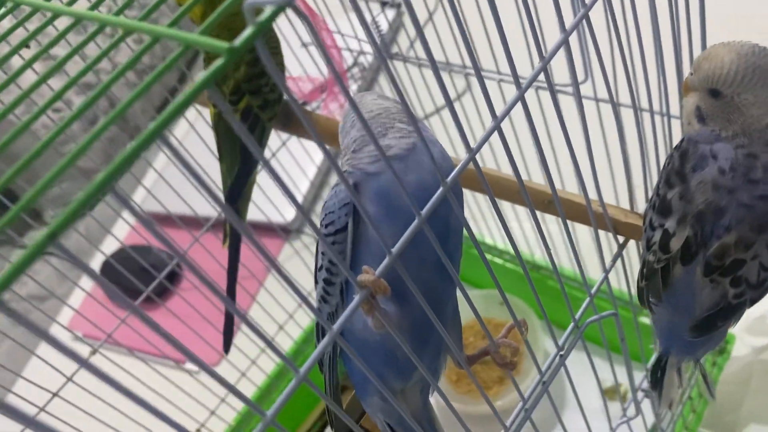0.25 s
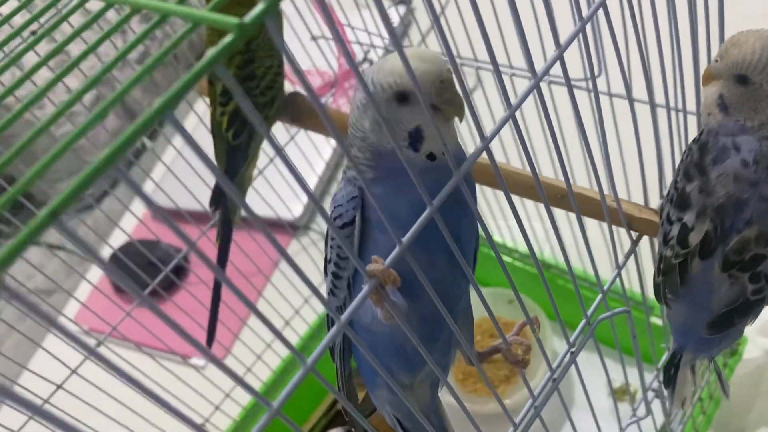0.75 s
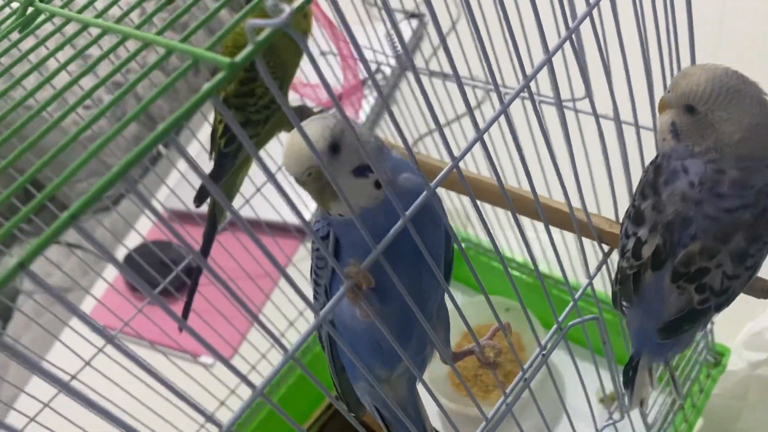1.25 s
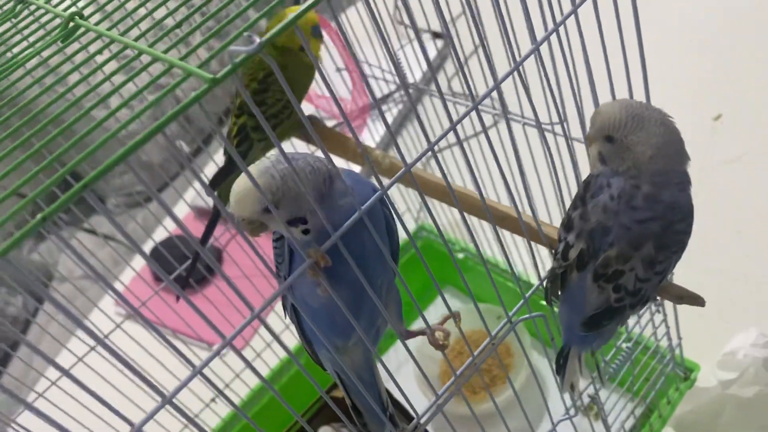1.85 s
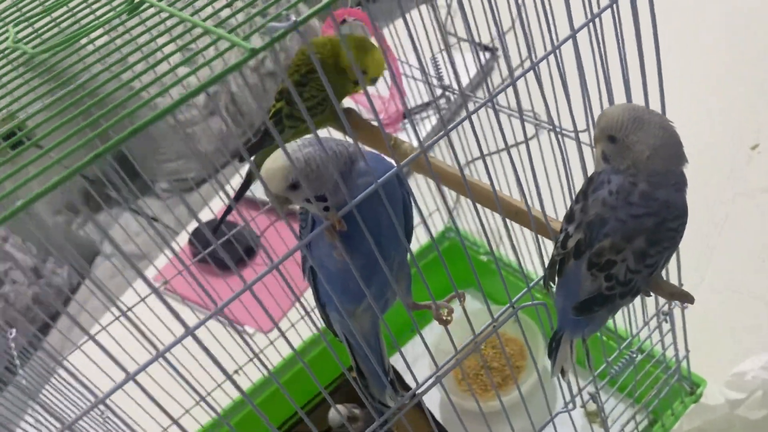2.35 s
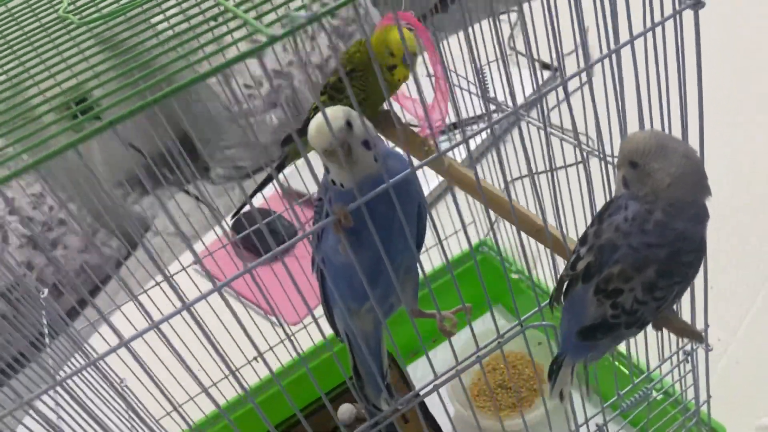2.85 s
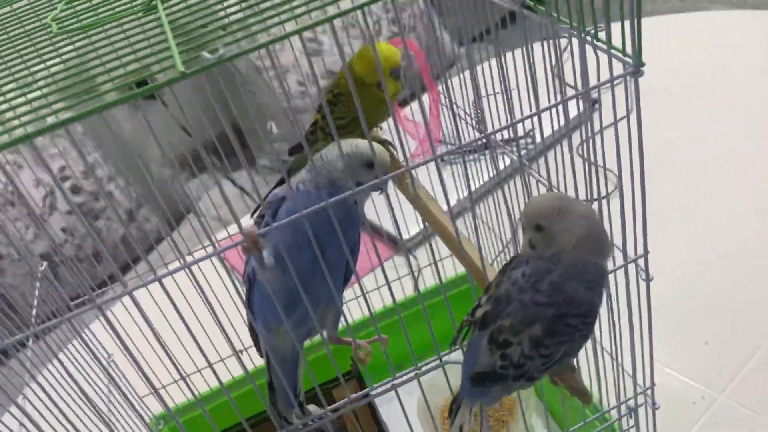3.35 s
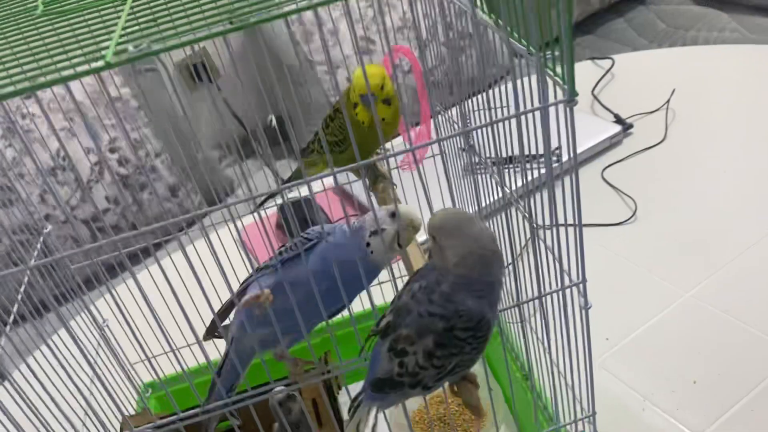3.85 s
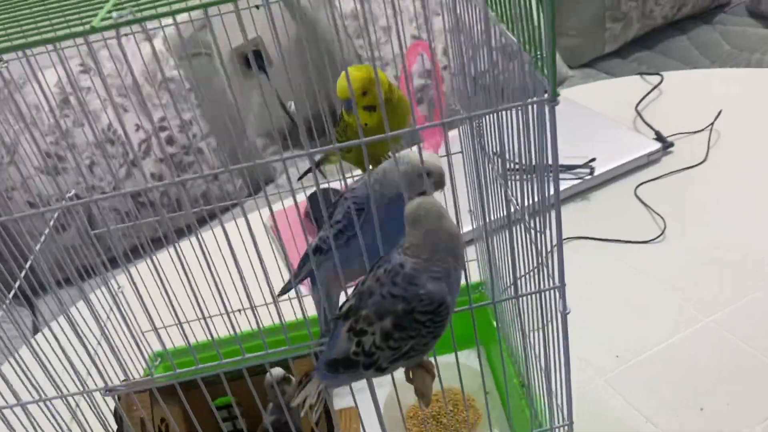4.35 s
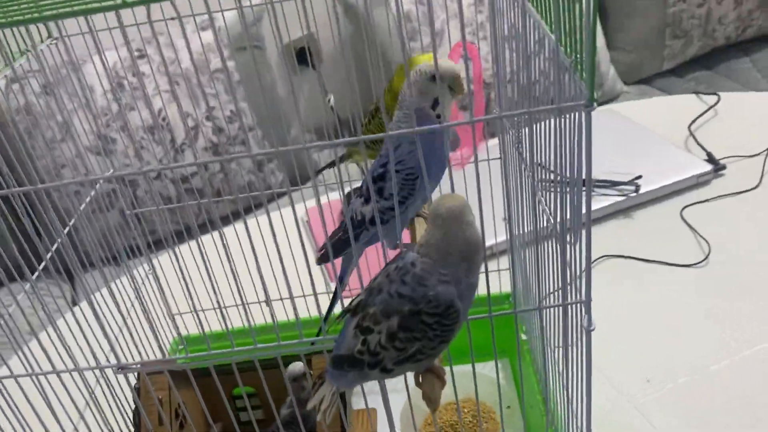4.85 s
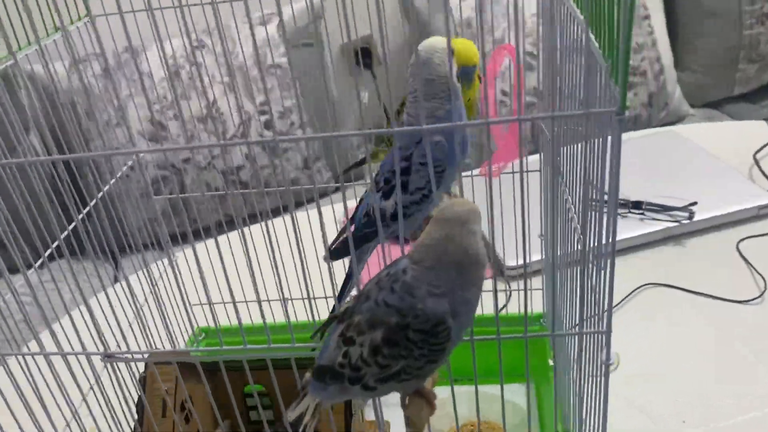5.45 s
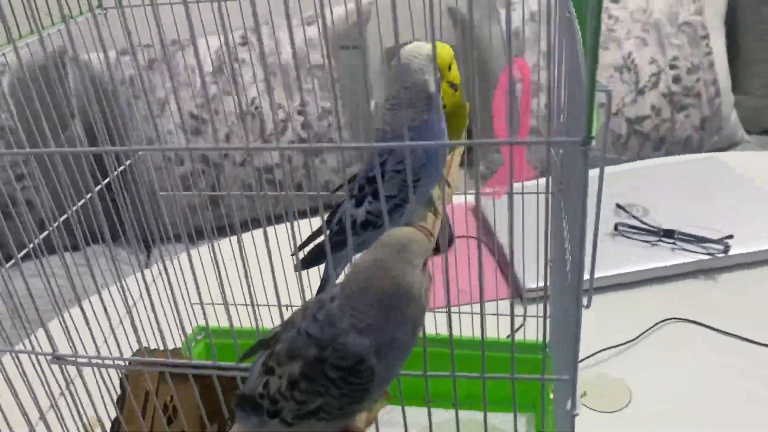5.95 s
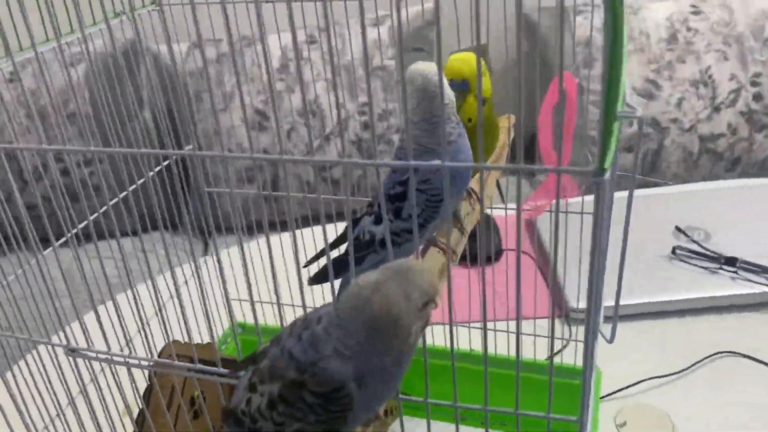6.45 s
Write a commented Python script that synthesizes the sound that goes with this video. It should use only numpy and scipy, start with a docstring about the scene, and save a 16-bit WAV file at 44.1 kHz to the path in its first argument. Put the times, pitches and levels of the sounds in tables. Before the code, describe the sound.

Small caged parrots chatter in short, high calls with brief lulls, adding soft clucking, thin warbles and a few buzzes.

```python
"""Three budgerigars chirp, cheep, squeal and warble in a wire cage in a living room, close to a phone. Each
bird's voice box (the syrinx) whistles, and rasps when a second, slower vibration shakes it. Between the calls
come rising clucks, a few buzzes, light taps of beak and claws, a low thump of wing or body, and one soft plop.
The hand holding the phone makes a low rustle, and the room rings briefly after the birds' sounds."""
import sys
import numpy as np
from scipy import signal
from scipy.fft import rfft, irfft
from scipy.io import wavfile
from scipy.ndimage import map_coordinates

SR = 44100
rng = np.random.default_rng(int(sys.argv[2]) if len(sys.argv) > 2 else 0)


def digitize_waveform(pressure):
    """Quantize a signal to 16-bit integers and store it at the path in sys.argv[1].

    Rows of a 2-D input are taken as channels; values are limited to [-1, 1].
    """
    field = np.atleast_2d(pressure).T
    bounded = np.clip(field, -1, 1)
    quanta = np.round(bounded * 32767).astype(np.int16)
    wavfile.write(sys.argv[1], SR, quanta)


N = 295470

# How well throat and beak let overtones and breath out. Each row: frequency in Hz, gain in dB.
BEAK_COLOUR = [(2500, -0.5), (4700, 10), (6000, -5), (7100, -4.5), (8400, -5.5), (9800, -19.5)]


def undb(db):
    """Turn decibels into a factor to multiply by."""
    return 10 ** (np.asarray(db) / 20)


def unit(x):
    """Scale a sound to an average strength (rms) of 1."""
    return x / np.sqrt(np.mean(x ** 2) + 1e-20)


def along(points, hz):
    """Read between (Hz, value) points, giving every octave equal space."""
    f, value = np.transpose(points)
    return np.interp(np.log(np.maximum(hz, 1)), np.log(f), value)


def shaped(x, colour):
    """Filter a sound by (Hz, dB) points and scale it to strength 1."""
    gain = undb(along(colour, np.fft.rfftfreq(len(x), 1 / SR)))
    return unit(irfft(rfft(x) * gain, len(x)))


def noise(colour):
    """Noise with the given mix of lows and highs."""
    return shaped(rng.standard_normal(N), colour)


def highpass(x, hz, order):
    """Cut the lows."""
    return signal.sosfilt(signal.butter(order, hz, "high", fs=SR, output="sos"), x)


def flutter(t, hz):
    """A smooth wobble through hz random values a second."""
    steps = rng.standard_normal(1024)
    return map_coordinates(steps, [t * hz], order=3, mode="wrap")


def gate(t, length, edge):
    """Fade in and out, taking edge seconds each way."""
    return np.sin(np.pi / 2 * np.clip(np.minimum(t, length - t) / edge, 0, 1)) ** 2


def ring(hz, width):
    """The fading tone of a resonance struck once; a wider one fades sooner."""
    t = np.arange(1024) / SR
    return 2 * np.pi * width / SR * np.exp(-np.pi * width * t) * np.sin(2 * np.pi * hz * t)


def add(out, start, sound, pan_db=0):
    """Place a sound in the stereo track; pan_db is left minus right."""
    i = int(start * SR)
    part = sound[max(-i, 0):max(N - i, 0)]
    i = max(i, 0)
    out[:, i:i + len(part)] += undb(np.array([[pan_db], [-pan_db]]) / 2) * part


def air_and_rustle(air_db=-74, rustle_db=-59.5, start_s=3.85, hold_s=0.28, rise_db_per_s=31,
                   fall_db_per_s=20.5, width=0.36):
    """Still room air, and the hand on the phone: a low rustle that swells, holds and dies away."""
    # The tone of each noise. Each row: frequency in Hz, relative level in dB.
    air_colour = [(25, -7), (75, 3.5), (500, -9), (3000, -21.5), (10500, -35.5)]
    rustle_colour = [(25, -16.5), (70, 2), (150, -6.5), (250, -10), (520, -9.5), (610, -3.5), (720, -12.5),
                     (10000, -48)]
    t = np.arange(N) / SR
    since = t - start_s
    fade_db = rise_db_per_s * np.maximum(-since, 0) + fall_db_per_s * np.maximum(since - hold_s, 0)
    uneven_db = rustle_db - fade_db + 3 * flutter(t, 30)
    out = 0
    for colour, db in ((air_colour, air_db), (rustle_colour, uneven_db)):
        out = out + undb(db) * (noise(colour) + width * np.array([[1], [-1]]) * noise(colour))
    return out


def cage_taps(decay_s=0.0024, trim_db=-1.5):
    """Beak and claws make dry little knocks on bars and perch; the low first one is a thump of wing or body."""
    # Each row: start in seconds, level in dB before the trim, centre frequency in Hz.
    knocks = [(0.526, -59, 280), (0.89, -67, 600), (2.423, -58, 3110), (3.447, -59, 1870),
              (6.572, -54, 1114)]
    out = np.zeros((2, N))
    t = np.arange(512) / SR
    for start, db, hz in knocks:
        contact = rng.standard_normal(len(t)) * np.exp(-t / decay_s)
        knock = np.convolve(contact, ring(hz, width=hz))[:len(t)]
        add(out, start, undb(db + trim_db) * unit(knock))
    return out


def plop(fall=0.065):
    """A soft hollow plop near the phone: a few cycles of a low falling tone."""
    # Each row: start in seconds, length in seconds, pitch in Hz, level in dB.
    plops = [(2.233, 0.011, 546, -40)]
    out = np.zeros((2, N))
    for start, length, hz, db in plops:
        progress = np.linspace(0, 1, int(length * SR))
        phase = 2 * np.pi * np.cumsum(hz * (1 + fall * (.5 - progress))) / SR
        swell = np.sin(np.pi * np.sqrt(progress)) ** 2
        add(out, start, undb(db) * unit(np.sin(phase) * swell))
    return out


def buzzes(jitter=.14, scatter_db=3, hiss=0.083, edge_s=0.0095):
    """Slow, uneven slaps of the voice box make the throat ring, with a little breath between them."""
    # Each row: start and length in seconds, slaps a second, level in dB, treble tilt in dB.
    bursts = [(5.555, 0.038, 332.5, -39.5, -2.5), (5.586, 0.036, 257.4, -48.5, -10.5),
              (5.626, 0.043, 226.2, -45, -5), (5.669, 0.026, 136.4, -52, -7),
              (5.687, 0.093, 135.7, -63, -30.5), (5.874, 0.041, 93.5, -62, -17),
              (5.91, 0.044, 133.8, -54.5, -15), (6.076, 0.095, 415.6, -64, -13),
              (6.363, 0.022, 791, -31, 2)]
    # The throat's resonances. Each row: frequency in Hz, width in Hz, gain in dB before the tilt.
    resonances = [(1120, 790, 2.5), (2000, 1360, 4.5), (3790, 1130, 4.5), (6400, 1800, -8),
                  (9020, 1320, -19.5)]
    out = np.zeros((2, N))
    for start, length, rate_hz, db, treble_db in bursts:
        t = np.arange(int(length * SR)) / SR
        chance = rng.standard_normal((128, 2))
        gaps = np.exp(jitter * chance[:, 0])
        slap_samples = ((np.cumsum(gaps) - .8) / rate_hz * SR).astype(int).clip(0)
        slaps = np.bincount(slap_samples, undb(scatter_db * chance[:, 1]), len(t))[:len(t)]
        breath = hiss * np.sqrt(rate_hz / 300) * rng.standard_normal(N)[:len(t)]
        drive = (slaps + breath) * (0.15 + gate(t, length, edge_s))
        throat = sum((-1) ** k * undb(gain_db + treble_db * np.log(hz / 1000)) * ring(hz, width)
                     for k, (hz, width, gain_db) in enumerate(resonances))
        sound = highpass(signal.fftconvolve(drive, throat), 280, order=1)
        add(out, start, undb(db) * sound / np.std(sound[:len(t)]))
    return out


def clucks(start_hz=847, doubling_s=0.00686, usual_top_hz=2192, usual_db=-35, edge_s=0.0033,
           rough=0.079, hiss_db=-19, trim_db=-5):
    """Very short notes, rich in overtones, that sweep steeply up; the longest level off as a whistle."""
    # Each row: start in seconds, length in seconds, level in dB before the trim.
    sweeps = [(3.78, 0.0041, -41), (3.83, 0.0099, -33.5), (3.88, 0.0093, -41.5), (3.935, 0.011, -34),
              (3.993, 0.01, -36), (4.049, 0.019, -31), (4.111, 0.012, -39), (4.17, 0.0095, -34),
              (4.233, .012, -32.5), (4.315, 0.013, -30.5), (4.379, .012, -34.5), (4.463, 0.01, -36)]
    out = np.zeros((2, N))
    air = noise(BEAK_COLOUR)
    for start, length, db in sweeps:
        top_hz = usual_top_hz * np.exp(.02 * (db - usual_db))  # stronger clucks can climb higher
        t = np.arange(int((length + edge_s / 2) * SR)) / SR
        hz = np.minimum(start_hz * 2 ** (t / doubling_s), top_hz) * np.exp(flutter(t, 308) / 20)
        phase = 2 * np.pi * np.cumsum(hz) / SR
        # the mouth muffles overtones that climb past its upper resonance
        tone = sum(undb(harmonic_db) * np.sin(k * phase) / (1 + (k * hz / 5400) ** 5)
                   for k, harmonic_db in enumerate(harmonic_levels(), 1))
        hiss = undb(hiss_db) * (1 + np.sin(phase)) * air[int(start * SR):][:len(t)]
        voice = tone * np.exp(rough * flutter(t, 3021)) + hiss
        add(out, start, undb(db + trim_db) * unit(voice * gate(t, t[-1], edge_s)))
    return out


def harmonic_levels():
    """The relative level in dB of each harmonic in a cluck, lowest first."""
    levels = [1, -2.5, -9, -26, -37]
    return levels


def syrinx(glide, db, rough, overtones_db, air, rasp_hz=420, swing=0.27, jitter=0.14, quiver=0.031,
           shimmer=0.92, rolloff_db=-3, air_db=-22, swell_db=5, edge_s=0.0032):
    """The voice box whistles one note; in rough notes a slower vibration shakes pitch and strength."""
    t = np.arange(len(glide)) / SR
    rasp = np.sin(2 * np.pi * np.cumsum(rasp_hz * np.exp(flutter(t, 150) / 2)) / SR)
    shake = swing * rasp + jitter * flutter(t, 1200)
    hz = glide * (1 + rough * shake + quiver * flutter(t, 250))
    phase = 2 * np.pi * np.cumsum(hz) / SR
    # each overtone flickers on its own; loud and rough notes are brighter
    upper = sum(undb(rolloff_db * k) * np.sin(k * phase) * np.exp(flutter(t, rasp_hz) / 2)
                for k in range(2, 5))
    upper_db = overtones_db + 0.46 * (db + 41.5) + 8 * rough
    # a puff of air escapes once a cycle while the membranes rattle
    hiss = rough * undb(air_db) * (1 + np.sin(phase)) * air[rng.integers(N // 2):][:len(t)]
    tone = unit(np.sin(phase)) + undb(upper_db) * shaped(upper, BEAK_COLOUR) + hiss
    rattle = rough * (rasp + shimmer * flutter(t, 500))
    strength = np.exp(np.tanh(rattle + 0.3464 * flutter(t, 230)))
    # pure notes grow as the pressure builds
    swell = undb(swell_db * np.maximum(1 - 2 * rough, 0) * np.sqrt(t / t[-1]))
    return undb(db) * unit(tone * strength * swell * gate(t, t[-1], edge_s))


def warbles(air, turn_s=.067, dip=0.17, deepen_per_s=.8, overtones_db=-24):
    """A thin high whistle dips again and again, deeper and louder each turn, and roughens in the dips."""
    # Each row: start and length in seconds, top pitch in Hz, opening and closing level in dB.
    phrases = [(3.404, .215, 4250, -65.5, -48), (5.179, 0.095, 3884, -68.5, -59.5),
               (6.645, 0.086, 3920, -64, -58)]
    out = np.zeros((2, N))
    for start, length, top_hz, first_db, last_db in phrases:
        t = np.arange(int(length * SR)) / SR
        drop = (dip + deepen_per_s * t) * np.cos(np.pi * t / turn_s) ** 4
        db = np.linspace(first_db, last_db, len(t))
        rough = 0.064 + 0.99 * drop
        add(out, start, syrinx(top_hz * (1 - drop), db, rough, overtones_db, air))
    return out


def notes(middle_hz=2600, brighten_db=9, peep_overtones_db=-22.5, peep_pan_db=2):
    """Each call sings a set run of notes at its own pace, pitch and effort; peeps stand alone."""
    # The notes of each kind of call. Each row: delay and length in seconds, first and last pitch in Hz,
    # relative level in dB, roughness from 0 to 1.
    chirp_notes = [(0, .008, 2140, 2060, -9.5, .3), (.01, 0.017, 3120, 3247, -1.5, .07),
                   (.041, 0.019, 1924, 1800, -3, 0.29), (.056, 0.0097, 3526, 3250, -0.5, 0.05),
                   (.066, 0.038, 2556, 2458, -0.5, 0.5), (.101, .015, 2040, 1476, -4, 0.8)]  # tick, whistle, low dip, high pip, rasp, falling tail
    cheep_notes = [(0, .026, 2777, 2630, -7.5, .06), (.028, 0.03225, 2832, 2985, 2, 0.22),
                   (.062, .011, 3023, 3274, -3, 0.55), (.072, .028, 2820, 2655, 0, .25),
                   (.097, .014, 3250, 3500, 0, .62), (.102, .022, 2466, 1193, -4.5, 1)]  # soft whistle, trill, flick, held note, flick, falling tail
    squeal_notes = [(0, .04, 3150, 2552, -5, 0.52), (.046, 0.0369, 2191, 2712, 0.5, 0.46),
                    (.074, .01, 5250, 4870, 1, 0.13), (.074, 0.0354, 2800, 3500, -3, .8)]  # sinking whistle, rasp, squeak over a rising scratch
    # The calls. Each row: start in seconds, length factor, pitch factor, base level in dB, growth in dB,
    # boost of high notes in dB per octave, base overtone level in dB, left minus right in dB.
    chirps = [(-.014, 1.01, 1.01, -36.5, -0.5, 5, -25, 1.5), (.419, 0.92, 1.04, -26.5, -6, 8, -25, 1),
              (1.424, .97, 0.99, -47.5, 4, -4.5, -11.5, 1), (2.644, 0.98, .99, -40.5, -2, -2, -18, -1.5),
              (3.027, 1.02, 1.01, -37, 1.5, 3.5, -25, 0), (4.64, 0.95, .98, -37.5, -1, -3, -13.5, 0)]
    cheeps = [(.677, 1.025, 1.014, -32, -7.5, 3, -25, 2.3), (1.744, 1.02, 1, -35, 1, 0, -18.5, .5),
              (3.629, .88, .96, -37.5, -9, -4, -16, -1.1)]
    squeals = [(.943, 1.03, 0.98, -44.5, 1.3, 1, -33, -1.7),
               (5.331, 1.026, 1.02, -46, 9.1, -1.2, -23, 0.75)]
    # Each row: start and length in seconds, first and last pitch in Hz, level in dB, roughness.
    peeps = [(.346, 0.016, 2635, 2302, -43.5, 0.13), (0.372, .015, 2750, 2200, -39, 0.3),
             (0.39, 0.016, 2770, 3040, -35.5, .04), (0.41, .016, 2990, 2578, -32.5, 0.4),
             (0.901, 0.021, 3320, 3174, -50, 0.04), (0.997, 0.0094, 5160, 3580, -43.5, 0.12),
             (1.048, 0.017, 3120, 3120, -42.5, 0.17), (1.11, 0.0199, 4350, 3780, -46, 0.1),
             (1.13, 0.0085, 3245, 3140, -36, 0.19), (5.274, 0.029, 3485, 2734, -52, 0.83),
             (5.963, 0.019, 3440, 3106, -61, 0.3), (6.01, .015, 3170, 3405, -62.5, 0.27)]
    for run, calls in ((chirp_notes, chirps), (cheep_notes, cheeps), (squeal_notes, squeals)):
        for start, stretch, pitch, db, growth_db, tilt_db, overtones_db, pan_db in calls:
            places = np.linspace(-.5, .5, len(run))
            for place, (delay, length, first, last, note_db, rough) in zip(places, run):
                effort_db = growth_db * place + tilt_db * np.log2((first + last) / 2 / middle_hz)
                yield (start + stretch * delay, stretch * length, pitch * first, pitch * last,
                       db + note_db + effort_db, rough, overtones_db + brighten_db * place, pan_db)
    for peep in peeps:
        yield (*peep, peep_overtones_db, peep_pan_db)


def whistles(air, overlap_s=0.0046, bow=0.2425, straight_hz=2800):
    """Chirps, cheeps, squeals and peeps: high notes arch upward on their way, low notes sag."""
    out = np.zeros((2, N))
    for start, length, first, last, db, rough, overtones_db, pan_db in notes():
        progress = np.linspace(0, 1, int((length + overlap_s) * SR))
        arch = bow * np.log((first + last) / 2 / straight_hz) * np.sin(np.pi * progress)
        glide = (first + (last - first) * progress) * (1 + arch)
        add(out, start - overlap_s / 2, syrinx(glide, db, rough, overtones_db, air), pan_db)
    return out


def room(x, early_db=-5, early_s=0.019, tail_db=-11, build_s=0.021, bass_hz=900, shared=0.61):
    """Quick echoes from table and tray, then a smooth fading tail from the walls."""
    # Each row: frequency in Hz, seconds the tail takes to fade by 60 dB.
    fade_times = [(1300, 0.38), (3400, 0.35), (8000, 0.19)]
    t = np.arange(SR // 2) / SR
    f = np.fft.rfftfreq(len(t), 1 / SR)
    wash = rng.standard_normal((3, len(t)))  # left, right and common to both
    spectrum = rfft(wash[:2] + shared * wash[2]) * f / np.hypot(f, bass_hz)
    centres, fades = np.transpose(fade_times)
    tail = sum(irfft(spectrum * along(np.c_[centres, band], f), len(t)) * undb(-60 * t / fade_s)
               for band, fade_s in zip(np.eye(len(centres)), fades))
    tail = tail * np.clip((t - .004) / build_s, 0, 1)
    echoes = rng.standard_normal((2, len(t))) * (rng.random((2, len(t))) < .02)
    early = echoes * np.exp(-t / early_s) * (t > .001)
    response = (undb(tail_db) * unit(tail) + undb(early_db) * unit(early)) / np.sqrt(len(t))
    return signal.fftconvolve(x, response, axes=1)[:, :N]


def scene(cluck_room_db=-3, lag_samples=2):
    """The birds sit a little to the left, with the room's echo and the background around them."""
    air = highpass(noise(BEAK_COLOUR), 1400, order=2)
    calls = highpass(whistles(air) + warbles(air), 960, order=4)  # so small a bird gives little bass
    clucking = clucks()
    raspy = buzzes() + cage_taps()
    near = plop()
    left, right = calls + clucking + raspy
    direct = np.array([left, np.roll(right, lag_samples)]) + near  # the right side hears the cage later
    echo = room(calls + raspy + undb(cluck_room_db) * clucking + near / 10)
    return direct + echo + air_and_rustle()


def record(dry, top_hz=10400):
    """The phone's left microphone favours the whistles, its right the treble; the very top is cut."""
    # Each row: frequency in Hz, left minus right in dB.
    balance = [(1200, -2), (3000, 2.5), (8000, -2)]
    balance_db = along(balance, np.fft.rfftfreq(N, 1 / SR))
    heard = irfft(rfft(dry) * undb(np.array([balance_db, -balance_db]) / 2), N)
    return signal.sosfilt(signal.ellip(8, .2, 70, top_hz, fs=SR, output="sos"), heard)


dry = scene()
out = record(dry)
digitize_waveform(out)
```